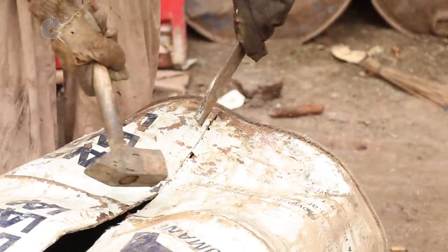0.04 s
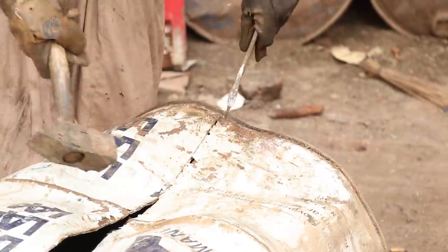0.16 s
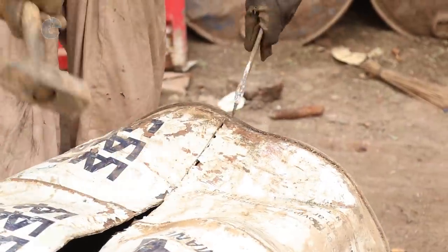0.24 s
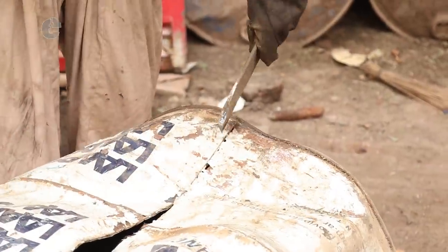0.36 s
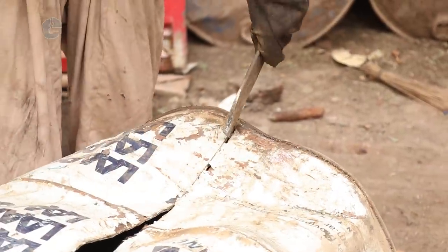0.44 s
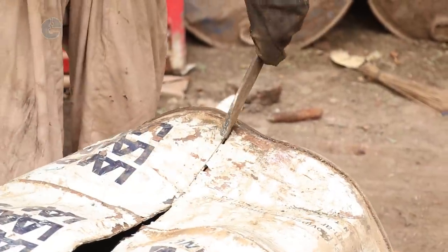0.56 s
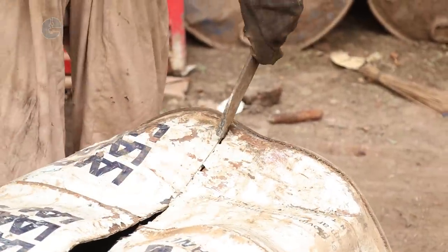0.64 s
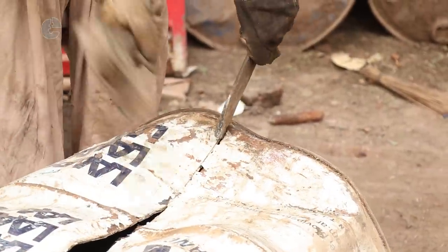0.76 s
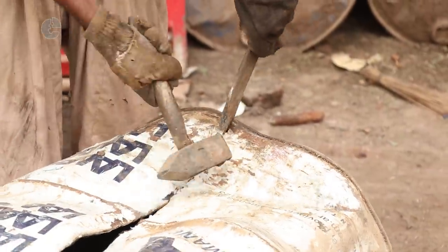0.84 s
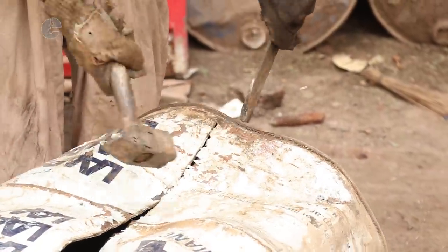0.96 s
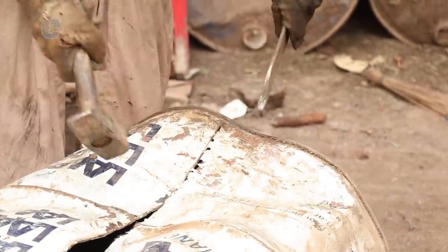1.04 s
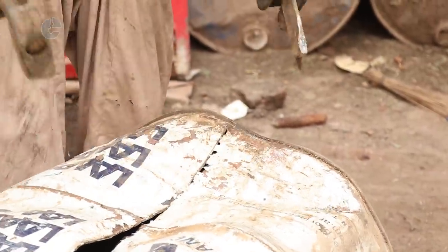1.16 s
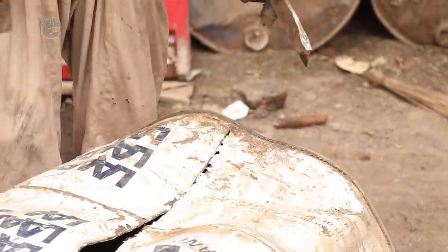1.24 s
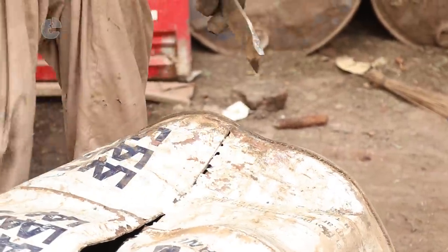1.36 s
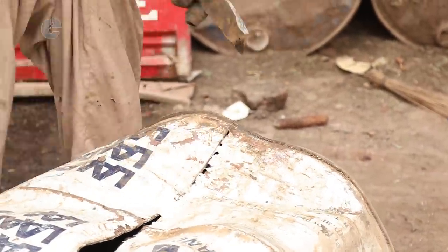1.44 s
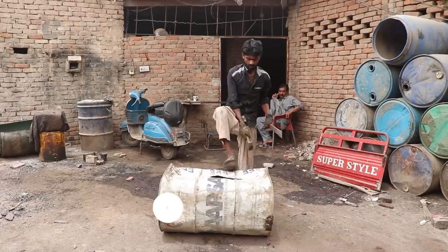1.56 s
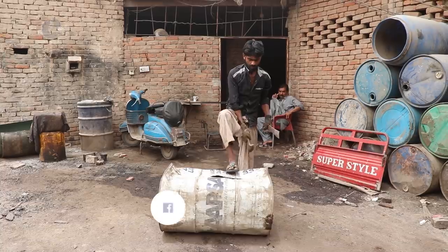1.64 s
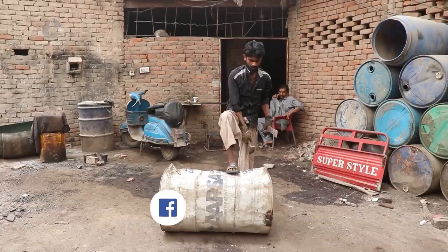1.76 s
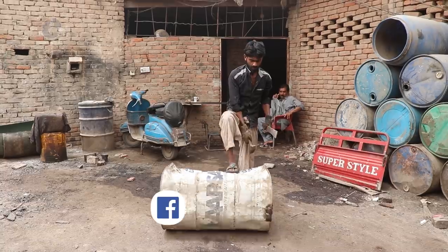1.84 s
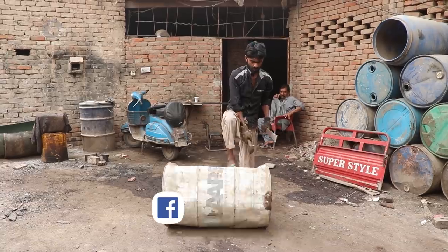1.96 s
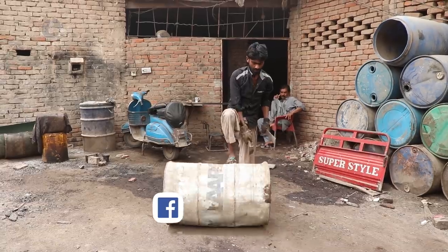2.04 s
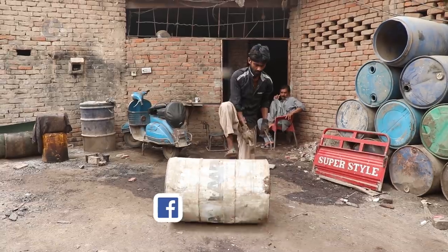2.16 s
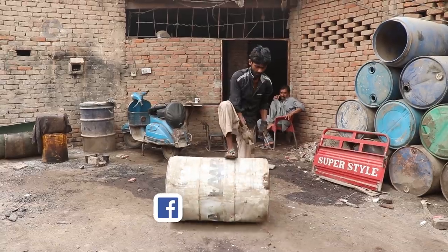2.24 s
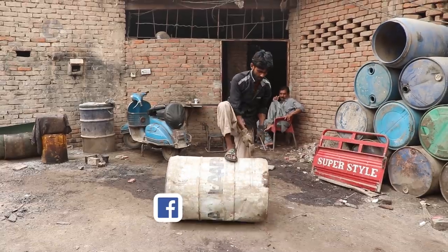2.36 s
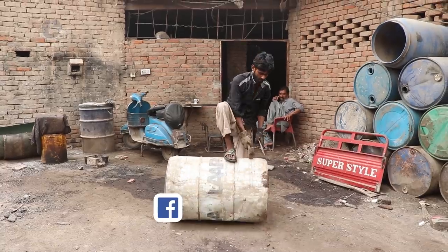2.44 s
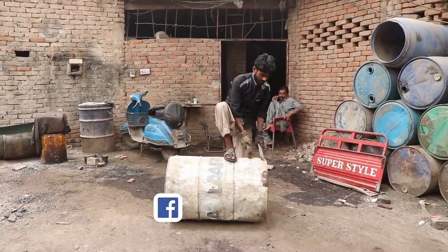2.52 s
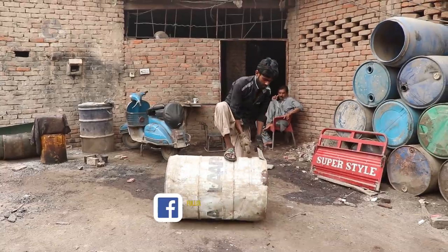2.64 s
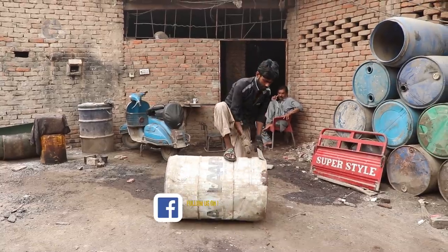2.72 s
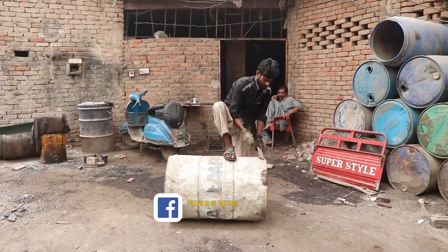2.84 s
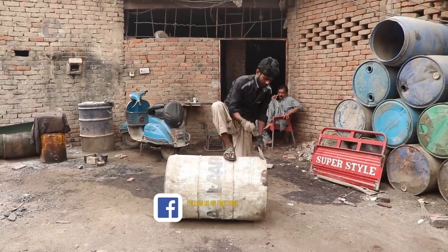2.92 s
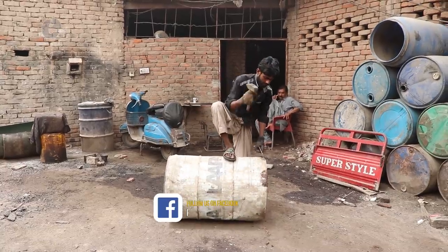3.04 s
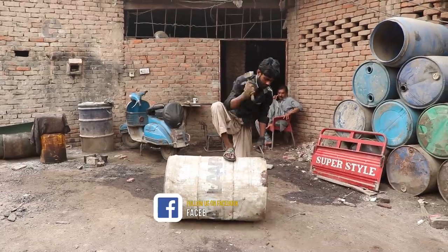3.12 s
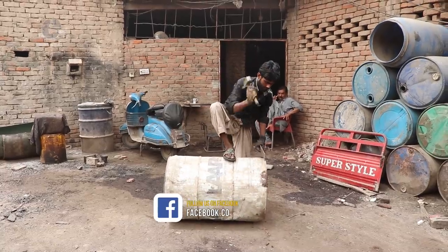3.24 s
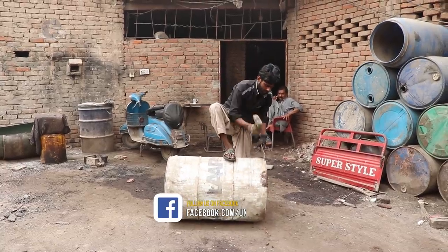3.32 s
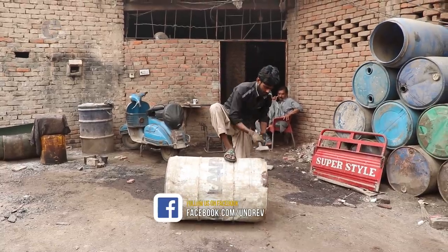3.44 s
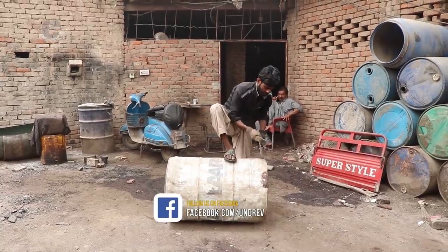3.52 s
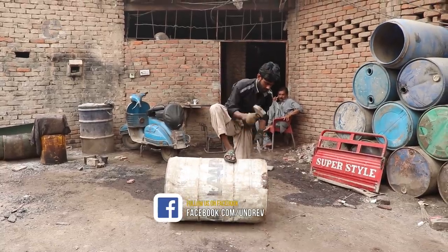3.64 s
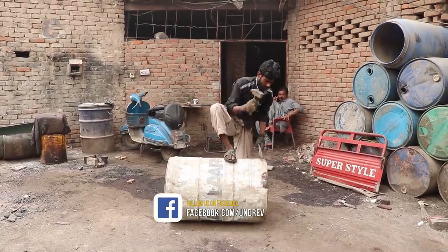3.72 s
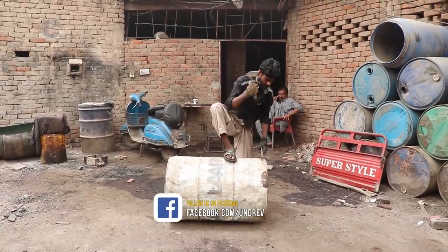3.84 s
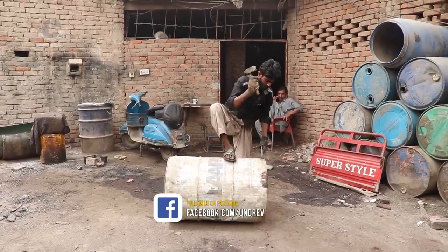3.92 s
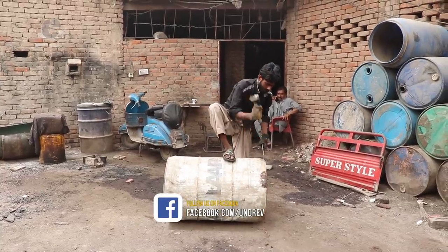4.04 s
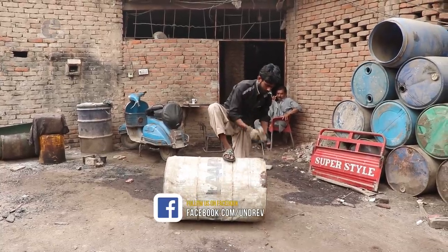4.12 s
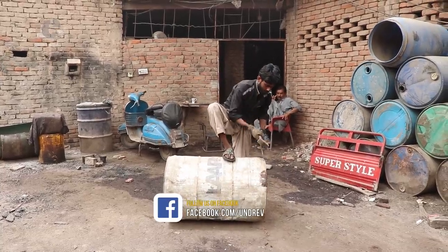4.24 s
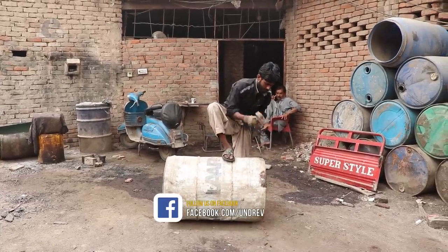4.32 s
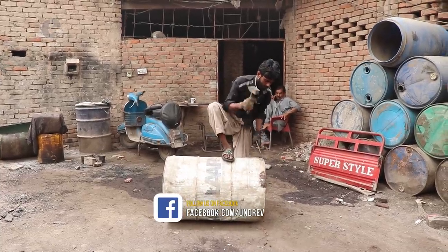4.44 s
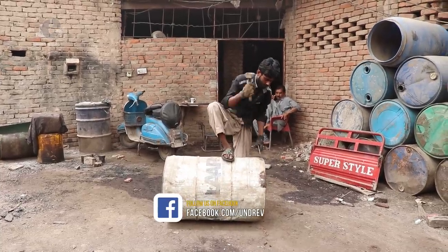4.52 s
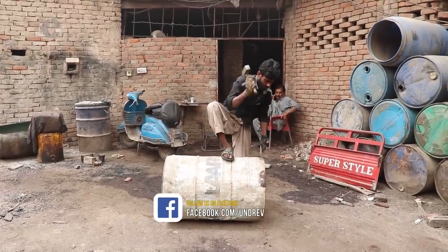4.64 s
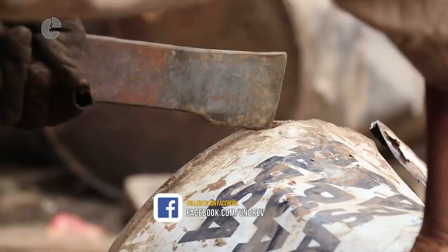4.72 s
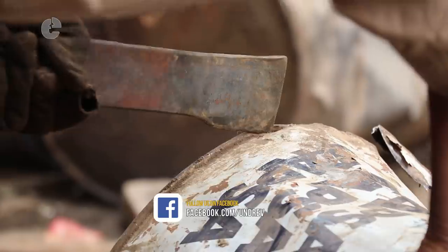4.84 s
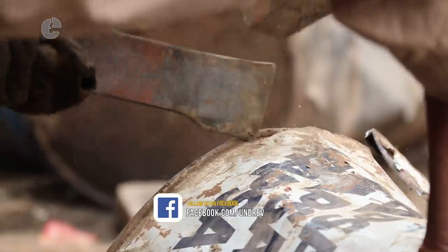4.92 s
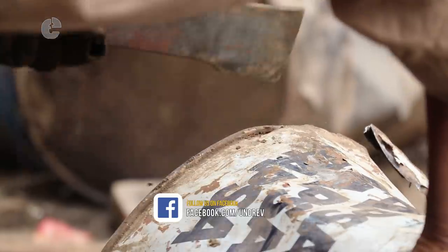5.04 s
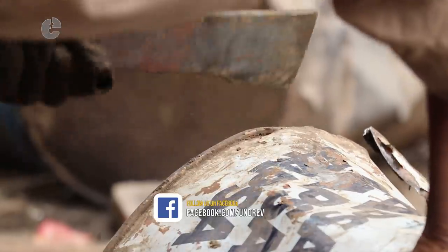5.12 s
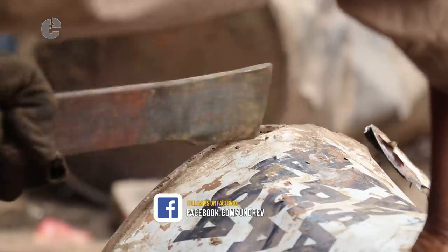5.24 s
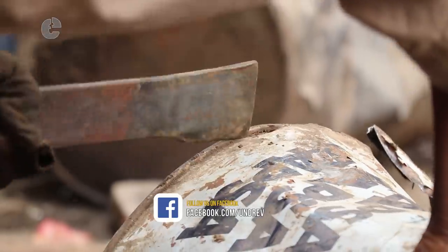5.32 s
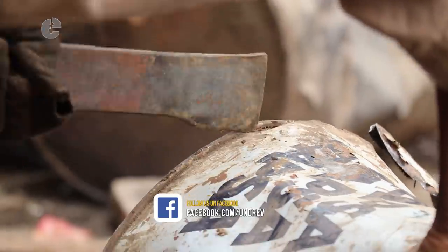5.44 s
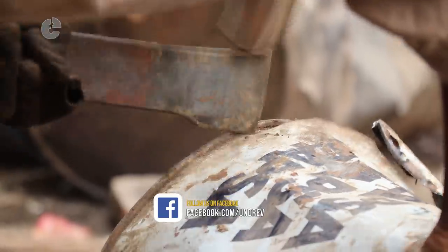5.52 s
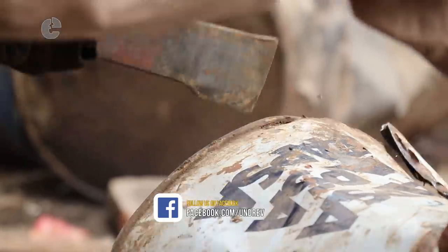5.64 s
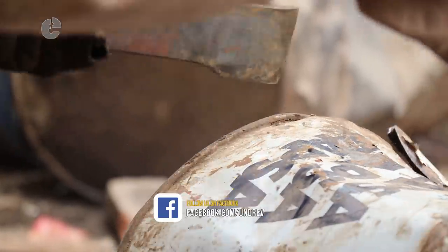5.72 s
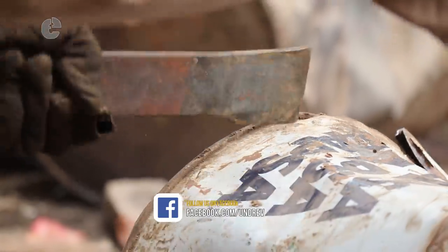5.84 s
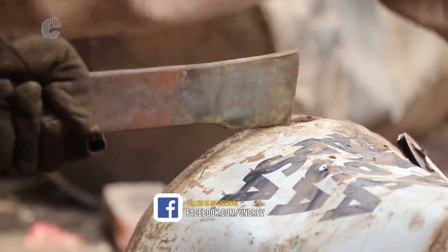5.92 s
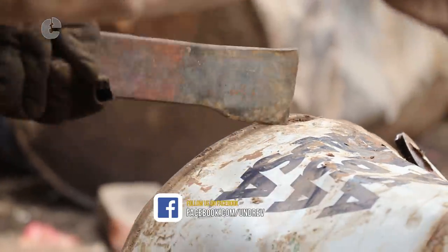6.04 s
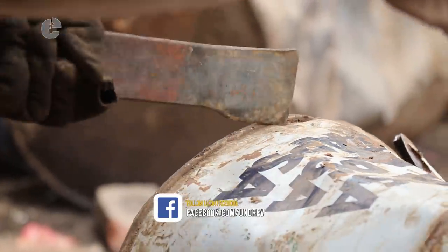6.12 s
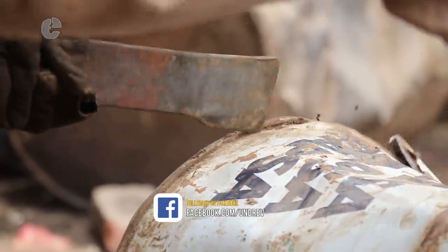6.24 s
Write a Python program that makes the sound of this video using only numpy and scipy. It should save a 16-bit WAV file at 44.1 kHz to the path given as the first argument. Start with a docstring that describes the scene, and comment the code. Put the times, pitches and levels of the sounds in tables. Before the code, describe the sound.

A hammer drives a chisel into a steel drum with sharp, ringing blows, while sparrows chirp faintly in a yard.

```python
"""A hammer drives a chisel into the seam of a steel drum in a walled yard, over a murmur of air and street.
Each blow cracks, and the shell rings with a few clear tones over a dense haze of small ones.
From 1.4 s sparrows chirp, with a thin rustle of wings and grit. Hard blows return on the drum's side
at 3.5 s, with light taps between them. The blade scrapes from 4.6 s, and the last blows hit the rim."""
import sys
import numpy as np
from scipy import signal
from scipy.fft import rfft, irfft, next_fast_len
from scipy.io import wavfile
from scipy.ndimage import uniform_filter1d

SR = 44100
rng = np.random.default_rng(int(sys.argv[2]) if len(sys.argv) > 2 else 0)


def log_audio(samples):
    """Write samples as a 16-bit WAV file to the path given in sys.argv[1]."""
    # one column per channel
    frames = np.atleast_2d(samples).T
    # limit to full scale, then quantise
    limited = np.clip(frames, -1, 1)
    pcm = np.round(limited * 32767).astype(np.int16)
    wavfile.write(sys.argv[1], SR, pcm)


N = 276507
RING = 32768  # samples given to one blow or echo

# Hammer hits. Boom changes the bass, sizzle the treble, ping the chisel's tones: (time [s], spot [name],
# force [dB], boom [dB], sizzle [dB], ping [dB], ring time [factor], rattle [s])
BLOWS = [(-.012, "seam", -11.5, -1.5, 4, -1, 1.07, 0.014),
         (.428, "seam tap", -19.5, -4.5, -0.2, 0.1, 0.88, 0.065),
         (.8695, "seam", -5.5, -4.5, 3.5, .5, 0.94, 0.011), (2.262, "side tap", -53, 14, 8, 0.1, 1.01, .03),
         (2.509, "side tap", -36, 3, -10, 3, 1.15, 0.025),
         (2.58, "side tap", -39, -2.9, -9, 0.1, 1.01, 0.027),
         (3.453, "side", -9.5, -2.8, 0.6, -2, 0.86, 0.0071),
         (3.811, "side tap", -27.5, -1.1, -4, 2, .92, 0.04),
         (4.2155, "side", -7.5, -3, -1.8, 2.5, 0.5, 0.03), (4.537, "side tap", -27, -4, -7, 2, 0.72, 0.03),
         (4.585, "side tap", -33.5, -9, -20, -12, .7, .04),
         (4.9085, "rim", -30.5, -10, 3, 0.1, 0.16, 0.0057),
         (4.9205, "rim", -6, .1, -0.8, -2.5, 0.79, 0.0035),
         (5.226, "rim tap", -22, -1.5, 5, 0.1, 0.95, 0.023), (5.252, "rim tap", -36, 5, 12, 0.1, 1.5, .02),
         (5.574, "rim", -6.5, 1.3, -0.1, 1.2, 0.86, 0.0043),
         (5.869, "rim tap", -19.5, -2.2, -4, -3, 0.96, 0.02),
         (6.213, "rim", -6, -1.5, -1.6, 0.1, 0.88, 0.0074)]
# Places struck, in the order used by the tone and haze tables: (spot [name])
SPOTS = ["seam", "seam tap", "side", "side tap", "rim", "rim tap"]
# Clear tones of the drum (low booms, higher clangs) and of hammer and chisel: (pitch [Hz])
BOOM_HZ = [88, 123, 158, 174, 195, 212, 231, 253, 272, 290, 311, 349, 403, 425, 479]
CLANG_HZ = [532, 616, 648, 682, 724, 791, 820, 839, 899, 915, 974, 997, 1227, 1289, 1440]
CHISEL_HZ = [1695, 2212, 2295, 2470, 3388, 3504, 6136, 9256, 12260]
# One row per pitch above: (base time to fade 60 dB [s], then relative level at each of six spots [dB])
DRUM_TONES = [(0.55, -15.5, -27.5, -22.5, -20, -13, -12.5), (0.42, -6, -24, -2, -8, -1.5, -20.5),
              (0.52, -1.5, -25, -22.5, -11.5, -9.5, -9), (.95, -17, -25.5, -18, -14.5, -10, -1),
              (0.68, -9.5, -13, -6, -7, -15, -4.5), (0.45, -4.5, -11.5, -3.5, -3, -3, -11.5),
              (0.85, -13, -15.5, -7, -9.5, -22.5, -30), (0.39, -9.5, -4, -3.5, -3, -5.5, 0),
              (0.86, -8.5, -18.5, -12.5, -12, -10, -7), (0.32, -3.5, -19.5, -26, -9.5, 0.5, -2),
              (0.45, -6, -15.5, -7, -4.5, -11, 4), (0.73, -12, -12.5, -13.5, -5.5, -10, -5),
              (0.59, -5, -5, -20.5, -6.5, -19.5, -18.5), (0.74, -15.5, -11, -17.5, -10, -18, -21),
              (0.7, -11, -12.5, -17.5, -3, -19, -19), (0.54, -14, -21.5, -14, -11.5, -20, -8),
              (0.7, -22.5, -17, -22, -9.5, -13, -30), (0.15, -15, -9, -21, -8, -9.5, -23),
              (0.65, -22, -25.5, -17.5, -10, -17, -20), (0.48, -19.5, -14.5, -14.5, -20, -18, -10.5),
              (0.56, -16.5, -15, -15.5, -14, -12.5, -14), (0.18, -15, -16.5, -18, -9, -10.5, -20),
              (0.31, -17.5, -11, -14, -10, -11.5, -17), (0.17, -19, -17, -17, -12.5, -16, -26),
              (0.58, -16, -17, -11, -22, -25.5, -22), (0.16, -16, -19, -17, -32, -24.5, -24),
              (0.27, -14, -21, -27.5, -30.5, -13, -22), (0.24, -24, -30.5, -14.5, -22, -27.5, -35),
              (0.15, -17, -19.5, -13, -9, -27.5, -30), (0.13, -11, -14, -32, -14, -22, -10.5)]
CHISEL_TONES = [(.3, -24, -22, -21, -24, -19, -22), (.36, -19, -20, -16, -26, -26, -26),
                (.36, -18, -19, -18, -30, -24, -27), (.16, -17, -12, -13, -24, -11, -23),
                (.12, -16, -21, -8, -22, -8, -21), (.3, -27, -28, -21, -32, -19, -40),
                (.1, -30, -42, -26, -40, -11, -36), (.13, -34, -42, -24, -40, -15, -40),
                (.28, -46, -54, -22, -54, -36, -54)]
# The shell's many small tones, one curve per spot: (pitch [Hz], relative level [dB])
HAZE_SPECTRA = [
    [(35, -54), (60, -21), (432, -4), (573, -13), (1030, -14), (1850, -17.5), (2400, -17), (10600, -37),
     (15400, -41.5), (16500, -64)],
    [(35, -67.5), (60, -33), (246, -16), (311, -15), (403, -4.5), (1210, -20.5), (3670, -28), (9610, -42),
     (15400, -54.5), (16500, -91)],
    [(35, -38.5), (60, -18.5), (234, -5.5), (546, -21.5), (895, -13.5), (3340, -13.5), (5730, -22.5),
     (12700, -18), (14300, -27), (16500, -73.5)],
    [(35, -64), (60, -14), (311, -10), (497, -6), (834, -18.5), (1610, -17), (1810, -20.5), (4220, -25),
     (12700, -46.5), (16500, -76)],
    [(35, -45), (60, -25.5), (101, -20.5), (199, -3.5), (629, -11.5), (5340, -20), (9170, -18),
     (14000, -19), (15400, -35.5), (16500, -58)],
    [(35, -67.5), (60, -21), (304, -2.5), (724, -11), (1190, -18.5), (1400, -19), (1940, -23.5),
     (3040, -20.5), (12400, -50), (16500, -83)],
]
# Where small tones crowd together or thin out: (pitch [Hz], width [Hz], level change [dB])
HAZE_CROWDS = [(45, 30, -5), (2150, 200, 3.5), (2900, 200, -2), (3400, 170, 2), (4650, 220, 3.5),
               (5500, 350, -3), (7700, 250, 2), (9300, 350, 2)]
# How long the haze and the yard's echo last: (pitch [Hz], base time to fade 60 dB [s])
HAZE_FADE = [(80, 0.76), (200, .45), (550, 0.5), (1500, 0.4), (3900, 0.23), (9000, 0.21), (12500, .13),
             (16000, 0.043)]
YARD_FADE = [(100, 0.68), (500, 0.65), (2000, 0.55), (6000, 0.45), (10000, 0.42), (14000, 0.14)]
# How alike the two ears' sounds are: (pitch [Hz], likeness [0 to 1])
EAR_LIKENESS = [(30, .85), (60, .99), (125, .994), (250, .985), (640, 0.83), (1400, 0.57), (3100, 0.36),
                (7000, 0.25), (15000, 0.2)]
# Which ear gets more: (pitch [Hz], left minus right [dB])
EAR_BALANCE = [(200, .3), (1000, -.3), (2400, -3.), (15000, -3.7)]
# Murmur of air and street: (pitch [Hz], relative level [dB])
AIR_SPECTRUM = [(25, -19), (60, -9.5), (120, -4), (200, -7), (500, -14.5), (1000, -19.5), (3000, -25.5),
                (5500, -34), (12000, -43), (13500, -58), (16500, -71.5)]
# The near sparrow's chirp, before each repeat varies it: (time [s], pitch [Hz], relative level [dB])
CHIRP_SHAPE = [(0, 4200, -14), (.008, 4800, -3), (.026, 4800, -2), (.036, 4200, 0), (.044, 5050, -7),
               (.05, 4150, 0), (.066, 4200, -1), (.082, 3650, -11), (.106, 3050, -27)]
# Its repeats: (time [s], level [dB], length [factor], pitch [factor])
CHIRPS = [(1.399, -54, 1.03, 1.001), (1.802, -49.5, 1.05, .99), (2.238, -50, 0.89, 1.001),
          (2.682, -47.5, 1.001, .99), (3.69, -49.5, .99, 1.01), (4.45, -54, 0.8, 1.02)]
# Bouts of a farther flock: (start [s], end [s], base level [dB], lowest top [Hz], highest top [Hz])
TWITTER_BOUTS = [(1.416, 1.56, -79, 5590, 13100), (1.565, 1.72, -70.5, 3980, 9300),
                 (1.806, 2.02, -88, 5030, 12300), (2.353, 2.5, -75, 3660, 11000),
                 (2.7, 2.94, -71, 4480, 13100), (3.101, 3.3, -77.5, 5570, 9900),
                 (3.9, 4.2, -80.5, 4000, 10800)]
# A reedy bird's phrase: (delay [s], length [s], start [Hz], top [Hz], end [Hz], relative level [dB])
PHRASE_NOTES = [(0, .066, 1800, 3370, 1900, -2), (.09, .05, 1750, 2850, 2300, -5),
                (.137, .085, 2200, 3020, 2950, -7)]
# When it sings: (time [s], level [dB])
PHRASE_STARTS = [(1.445, -76), (2.742, -73)]
# Its tones at 1, 2, 3 and 4 times the pitch: (relative level [dB])
OVERTONES_DB = [-12, -3, -4, -1]
# Other sparrows' single notes: (time [s], length [s], start [Hz], top [Hz], end [Hz], level [dB])
SINGLE_NOTES = [(1.463, 0.044, 6560, 7400, 6540, -62.5), (1.587, 0.048, 6200, 6900, 6000, -66.5),
                (1.716, 0.027, 4320, 4400, 3900, -62), (1.742, .065, 2730, 3300, 2800, -73),
                (1.756, 0.048, 3760, 4400, 4530, -62), (1.81, 0.041, 6500, 7700, 6740, -71),
                (1.942, 0.059, 2580, 3900, 4100, -80), (2.588, 0.042, 4620, 5600, 3980, -63),
                (2.636, 0.048, 3950, 4500, 4070, -56.5), (2.759, 0.052, 6440, 7400, 6500, -55),
                (2.965, .04, 3650, 4100, 3900, -64.5), (3.2, 0.05, 3970, 4900, 3500, -53.5),
                (3.255, 0.055, 3300, 4300, 2800, -59), (3.43, .04, 3900, 5600, 5800, -68),
                (3.902, 0.045, 3930, 4500, 4120, -59), (4.175, 0.06, 3500, 5600, 5900, -64),
                (6.07, .08, 3910, 4250, 3400, -72)]
# Puffs of wings and grit: (peak time [s], level [dB], time to rise 30 dB [s], time to fall 30 dB [s])
RUSTLE_PUFFS = [(1.47, -73, .12, .3), (1.7, -76, .6, .07), (1.866, -77, .2, .04), (1.916, -81, .03, .08),
                (1.978, -79, .03, .12), (2.21, -69, .02, .3), (2.275, -61, .1, .12), (2.41, -76, .03, .09),
                (2.77, -66, .16, .13), (2.904, -73.5, .2, .11), (3.205, -77, .15, .2), (3.93, -83, .1, .06),
                (4.056, -80, .1, .1), (4.19, -63, .04, .03)]
# The blade's scrape: (time [s], level [dB])
SCRAPE_LEVELS = [(4.62, -73), (4.8, -59), (4.89, -53), (5.1, -54), (5.4, -55.5), (5.56, -63)]
# Tone color of the rustle and the scrape: (pitch [Hz], relative level [dB])
RUSTLE_SPECTRUM = [(800, -9), (3000, -5.5), (8000, -2), (12500, -5.5), (13500, -23.5), (16500, -39)]
SCRAPE_SPECTRUM = [(500, -6), (1950, -6.5), (2100, 5), (2250, -10), (12000, -23), (16000, -27.5)]


def gain_of(db):
    """Turns decibels into a number to multiply by."""
    return 10 ** (np.maximum(db, -200) / 20)


def unit_level(x):
    """Scales a sound to an average power of one."""
    return x / np.sqrt(np.mean(x ** 2) + 1e-20)


def value_at(points, hz):
    """Looks up a curve at the given pitches."""
    pitches, values = np.transpose(points)
    return np.interp(np.log(hz + 1), np.log(pitches + 1), values)


def add(mix, start_s, sound):
    """Mixes a sound in, cutting off what falls outside."""
    at = round(start_s * SR)
    part = mix[:, max(at, 0):at + sound.shape[-1]]
    part += sound[..., max(-at, 0):][..., :part.shape[1]]


def jitter(length, smooth):
    """A random wiggle: noise averaged over `smooth` samples."""
    return unit_level(uniform_filter1d(rng.standard_normal(length), smooth))


def random_spectra(hz):
    """Two spectra with a random strength and phase at every pitch."""
    return rng.standard_normal((2, len(hz))) + 1j * rng.standard_normal((2, len(hz)))


def two_ears(spectra, hz):
    """Makes left and right: alike in the bass, different and leaning right in the treble."""
    likeness = np.clip(value_at(EAR_LIKENESS, hz), 0, 1)
    lean = gain_of(value_at(EAR_BALANCE, hz) / 2)
    right = likeness * spectra[0] + np.sqrt(1 - likeness ** 2) * spectra[1]
    return np.array([spectra[0] * lean, right / lean])


def fade(t, fade_s, rattle_s):
    """Holds while loose steel rattles on, then falls 60 dB every fade_s and ends at zero."""
    fading_time = np.sqrt(t * t + rattle_s ** 2) - rattle_s
    return gain_of(-60 * fading_time / fade_s) * np.minimum(1, 8 * (RING / SR - t))


def fade_by_band(spectrum, fade_times, stretch, rattle_s, rise_cycles):
    """Splits a steady sound into ten pitch bands; each rises and dies at its own speed."""
    hz, t = np.fft.rfftfreq(RING, 1 / SR), np.arange(RING) / SR
    centers = np.geomspace(60, 16000, num=10)
    out = 0
    for k, center in enumerate(centers):
        band = np.interp(np.log(hz + 1), np.log(centers), np.arange(10) == k)
        rise = np.tanh(t * center / rise_cycles)
        fall = fade(t, stretch * value_at(fade_times, center), rattle_s)
        out = out + irfft(spectrum * band, RING) * rise * fall
    return out


def shell_haze(spot, color, stretch, rattle_s):
    """The shell shakes in so many small ways that their tones blur together."""
    hz = np.fft.rfftfreq(RING, 1 / SR)
    present = rng.random(len(hz)) < SR / RING / 9  # about one tone every 9 Hz
    level = present * gain_of(value_at(HAZE_SPECTRA[spot], hz))
    tones = two_ears(random_spectra(hz), hz) * level / np.linalg.norm(level) * RING / 2
    crowd_db = sum(db * np.exp(-((hz - pitch) / width) ** 2) for pitch, width, db in HAZE_CROWDS)
    tones *= gain_of(value_at(color, hz) + crowd_db)
    return fade_by_band(tones, HAZE_FADE, stretch, rattle_s, rise_cycles=1)


def clear_tone(hz, fade_s, rattle_s):
    """One tone builds over a few cycles, then fades, wobbling as the loose sheet flexes."""
    t = np.arange(min(RING, round((.8 * fade_s + rattle_s) * SR))) / SR
    wobble_hz, phase = rng.uniform(6, 20), rng.random()
    wobble = 1 + .33 * np.sin(2 * np.pi * (wobble_hz * t + phase))
    rise = np.tanh(t * hz / 3.4)
    ending = np.minimum(1, 30 * (t[-1] - t))
    return np.sin(2 * np.pi * hz * t) * rise * fade(t, fade_s, rattle_s) * wobble * ending


def hammer_blow(spot, force_db, boom_db, sizzle_db, ping_db, stretch, rattle_s):
    """Steel cracks on steel and sets the drum, hammer and chisel ringing."""
    color = [(200, boom_db), (500, 0), (2000, 0), (6000, sizzle_db)]
    haze = shell_haze(spot, color, stretch, rattle_s)
    clear = np.zeros((1, RING))
    for hz, (fade_s, *spot_db) in zip(BOOM_HZ + CLANG_HZ + CHISEL_HZ, DRUM_TONES + CHISEL_TONES):
        # The dented shell shifts each tone's pitch and strength a little from blow to blow.
        drift, uneven_db = rng.normal(0, [.003, 1.2])
        tone = clear_tone(hz * (1 + drift), stretch * fade_s, rattle_s)
        level_db = spot_db[spot] + uneven_db + value_at(color, hz) + ping_db * (hz in CHISEL_HZ)
        direction = rng.choice([-1, 1])  # starts inwards or outwards
        add(clear, 0, direction * gain_of(level_db) * tone)
    t = np.arange(RING) / SR
    crack_db = sizzle_db + .18 * force_db - t / .00079  # lighter hits lose extra crack
    crack = np.diff(rng.standard_normal((2, RING + 1))) * gain_of(crack_db)
    return gain_of(force_db) * (gain_of(-6.5) * haze + gain_of(-7.9) * clear + gain_of(-16) * crack)


def yard_echo(sound):
    """After a short gap the walls send back a dense echo, different in each ear."""
    noise = rfft(rng.standard_normal((2, RING)))
    tail = fade_by_band(noise, YARD_FADE, stretch=1, rattle_s=0, rise_cycles=51)
    tail = irfft(two_ears(rfft(tail), np.fft.rfftfreq(RING, 1 / SR)), RING)
    delayed = np.pad(sound.mean(0), (400, 0))[None]
    return signal.fftconvolve(delayed, tail / np.linalg.norm(tail[0]), axes=1)[:, :N]


def grainy_noise(levels, spectrum, grain_db):
    """Flickering hiss that follows a (time [s], level [dB]) curve and is silent outside it."""
    times, db = np.transpose(levels)
    loudness = gain_of(np.interp(np.arange(N) / SR, times, db, left=-150, right=-150))
    grain = gain_of(grain_db * jitter(N, smooth=90))
    size = next_fast_len(N)
    hz = np.fft.rfftfreq(size, 1 / SR)
    hiss = irfft(two_ears(random_spectra(hz), hz) * gain_of(value_at(spectrum, hz)), size)
    return loudness * grain * unit_level(hiss[:, :N])


def air_murmur():
    """Air and street make a low, steady noise."""
    return grainy_noise([(0, -67.8), (7, -67.8)], AIR_SPECTRUM, grain_db=1)


def whistle(hz, twin_hz, db, twin_db):
    """A bird's throat sings two raspy voices at once, with a weak, blurred octave above."""
    waver, rasp = jitter(len(hz), smooth=40), jitter(len(hz), smooth=40)
    pitches = np.array([hz, twin_hz]) * (1 + .017 * waver)
    phase, twin_phase = 2 * np.pi * np.cumsum(pitches, axis=1) / SR
    voices = np.sin(phase) + gain_of(twin_db) * np.sin(twin_phase)
    side_tone = gain_of(twin_db - 22) * np.sin(2 * phase - twin_phase)
    octave = gain_of(-28.5) * rasp * np.sin(phase + twin_phase)
    return gain_of(db + 1.9 * rasp) * (voices + side_tone + octave)


def chirp(level_db, stretch, pitch_factor):
    """The near sparrow whistles two falling halves with a flick between."""
    times, pitches, levels = np.transpose(CHIRP_SHAPE)
    t = np.arange(0, times[-1], 1 / SR / stretch)
    hz = pitch_factor * np.interp(t, times, pitches)
    return whistle(hz, 1.085 * hz, level_db + np.interp(t, times, levels), twin_db=-5)


def arched_note(length_s, start_hz, top_hz, end_hz, level_db):
    """A whistle that climbs to top_hz halfway, then slides to end_hz."""
    u = np.linspace(-1, 1, round(length_s * SR))
    hz = top_hz - abs(u) ** 1.15 * np.where(u < 0, top_hz - start_hz, top_hz - end_hz)
    return whistle(hz, .89 * hz, level_db, twin_db=-11) * (1 - u ** 2)


def flock_twitter():
    """A farther flock scatters 14 short, random notes over each bout."""
    out = np.zeros((2, N))
    for start, end, level_db, low_hz, high_hz in TWITTER_BOUTS:
        for when, pitch, climb, fall, softness in rng.random((14, 5)):
            top_hz = low_hz + (high_hz - low_hz) * pitch
            start_hz, end_hz = top_hz * (1 - .35 * climb), top_hz * (1 - .2 * fall)
            note = arched_note(.04, start_hz, top_hz, end_hz, level_db - 5 - 8 * softness)
            add(out, start + (end - start) * when, note)
    return out


def reedy_note(length_s, start_hz, top_hz, end_hz, level_db):
    """A steep arch of pitch; strong overtones make it sound reedy."""
    u = np.linspace(-1, 1, round(length_s * SR))
    hz = top_hz - u ** 2 * np.where(u < 0, top_hz - start_hz, top_hz - end_hz)
    phase = 2 * np.pi * np.cumsum(hz) / SR
    rasp = jitter(len(u), smooth=40)
    tones = sum(gain_of(db) * np.sin(k * phase) for k, db in enumerate(OVERTONES_DB, start=1))
    return gain_of(level_db + 2.5 * rasp) * tones * np.sqrt(1 - u ** 2)


def birdsong():
    """Chirps, reedy phrases, single notes and the flock, all a little to the right."""
    out = np.zeros((2, N))
    for start, *settings in CHIRPS:
        add(out, start, chirp(*settings))
    for start, level_db in PHRASE_STARTS:
        for delay, *shape, db in PHRASE_NOTES:
            add(out, start + delay, reedy_note(*shape, level_db + db))
    for start, *settings in SINGLE_NOTES:
        add(out, start, arched_note(*settings))
    return (out + flock_twitter()) * gain_of([[-1.5], [1.5]])


def rustle():
    """Wings and grit make thin puffs of noise that swell and sink."""
    t = np.arange(0, N / SR, .004)
    level = 0
    for peak, db, rise, fall in RUSTLE_PUFFS:
        drop_db = 30 * np.where(t < peak, (peak - t) / rise, (t - peak) / fall)
        level = level + gain_of(db - drop_db)
    return grainy_noise(np.transpose([t, 20 * np.log10(level)]), RUSTLE_SPECTRUM, grain_db=2.5)


def blade_scrape():
    """The blade scrapes the steel: a hiss with a sharp peak near 2100 Hz."""
    return grainy_noise(SCRAPE_LEVELS, SCRAPE_SPECTRUM, grain_db=1)


def scene():
    """Blows and birds echo in the yard; scrape, rustle and air lie underneath."""
    drum = np.zeros((2, N))
    for start, spot, *settings in BLOWS:
        add(drum, start, hammer_blow(SPOTS.index(spot), *settings))
    birds = birdsong()
    echo = yard_echo(gain_of(-15) * drum + gain_of(-20) * birds)
    return drum + birds + echo + blade_scrape() + rustle() + air_murmur()


def record(dry):
    """The hardest blows overload a stereo microphone's forward half; the highest treble is cut."""
    ceiling, cutoff_hz = .48, 16300
    mid, side = (dry[0] + dry[1]) / 2, (dry[0] - dry[1]) / 2
    mid = mid / (1 + abs(mid / ceiling) ** 6) ** (1 / 6)  # rounds off the peaks
    treble_cut = signal.firwin(511, cutoff_hz, window=("kaiser", 9), fs=SR)
    return signal.oaconvolve(np.array([mid + side, mid - side]), treble_cut[None], "same")


dry = scene()
out = record(dry)
log_audio(out)
```